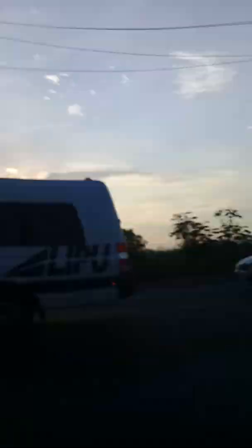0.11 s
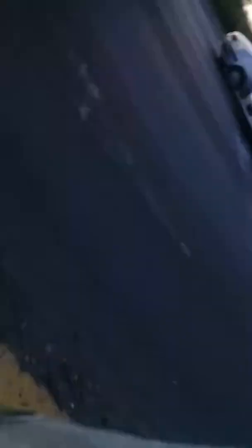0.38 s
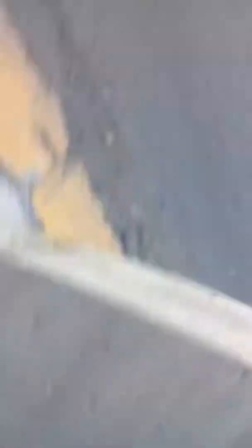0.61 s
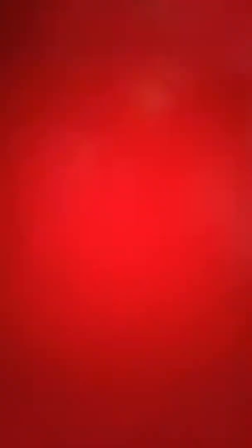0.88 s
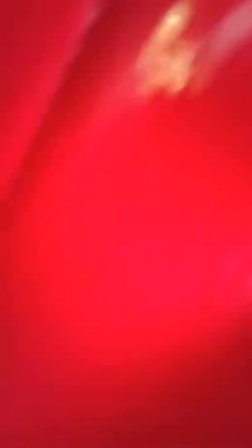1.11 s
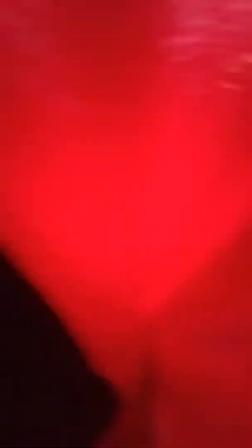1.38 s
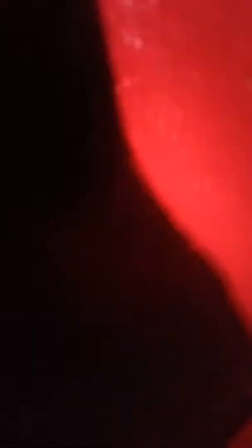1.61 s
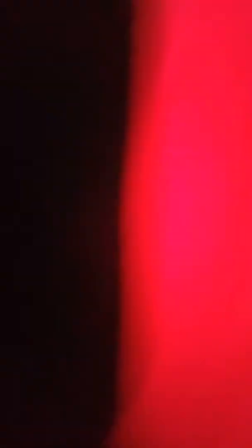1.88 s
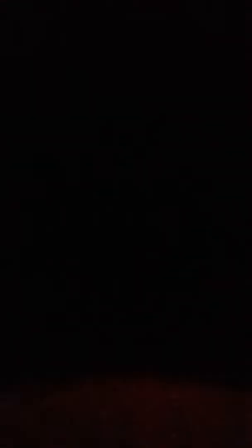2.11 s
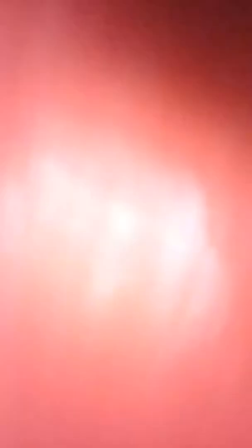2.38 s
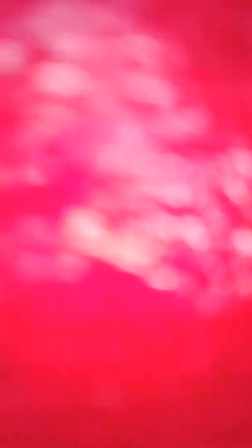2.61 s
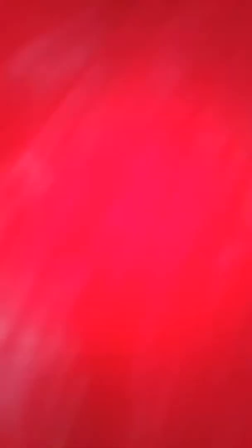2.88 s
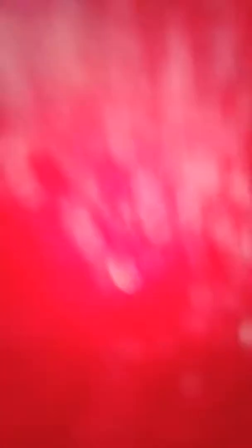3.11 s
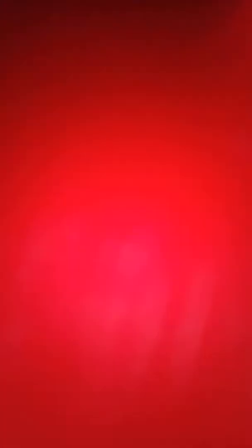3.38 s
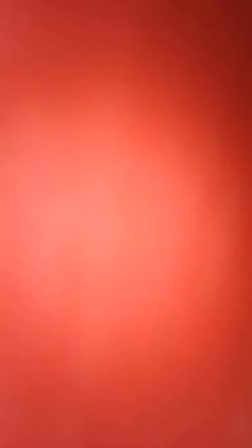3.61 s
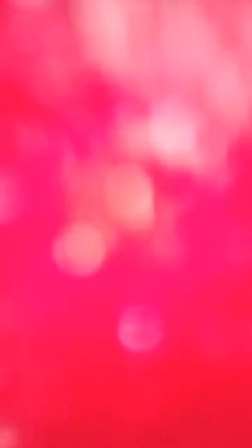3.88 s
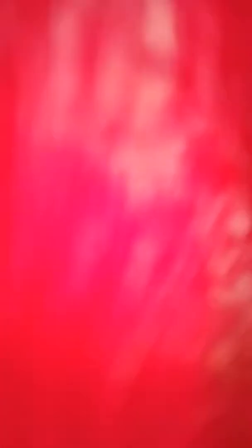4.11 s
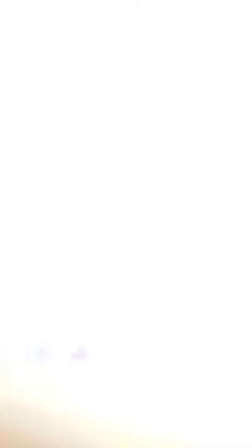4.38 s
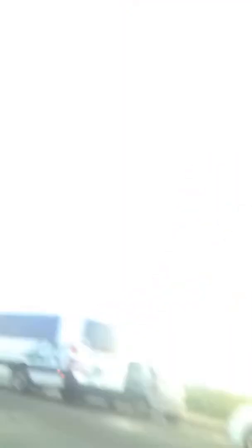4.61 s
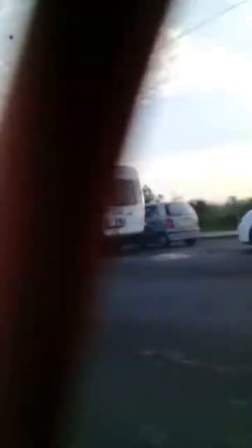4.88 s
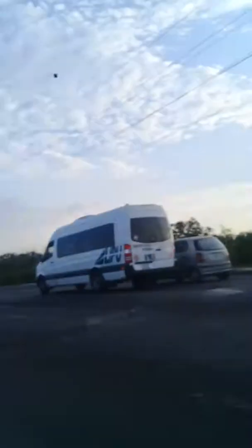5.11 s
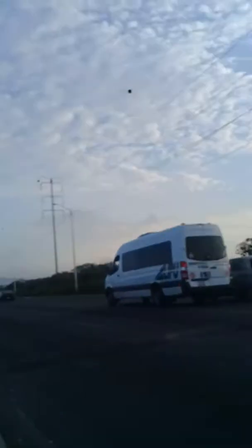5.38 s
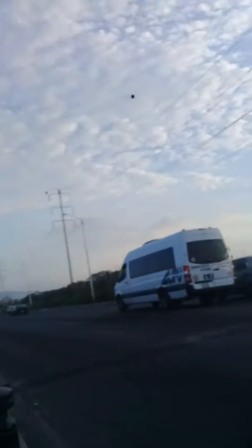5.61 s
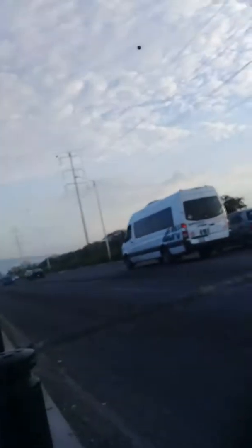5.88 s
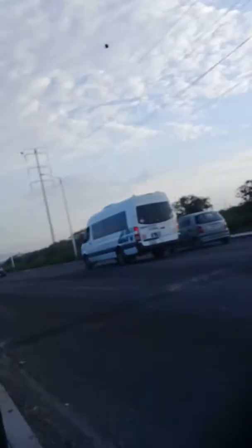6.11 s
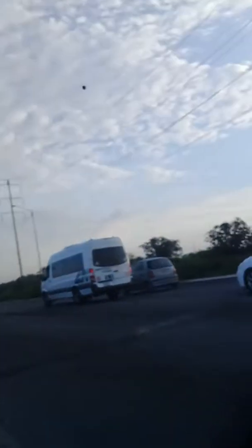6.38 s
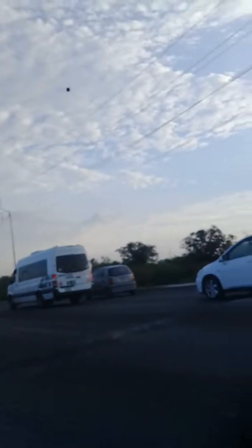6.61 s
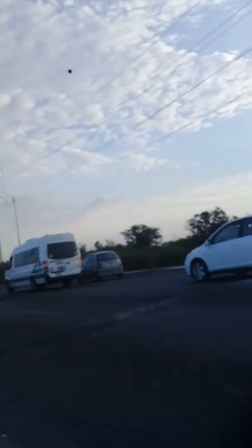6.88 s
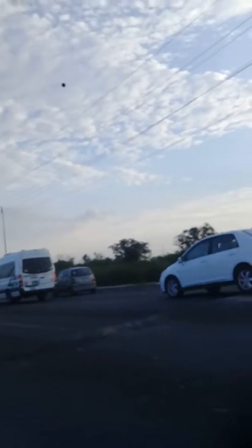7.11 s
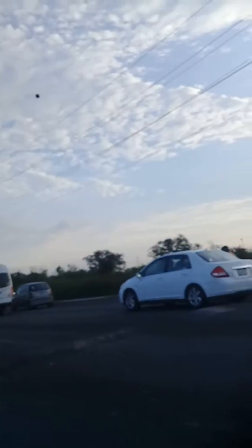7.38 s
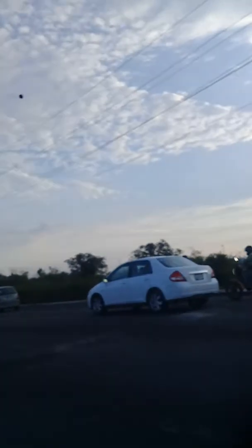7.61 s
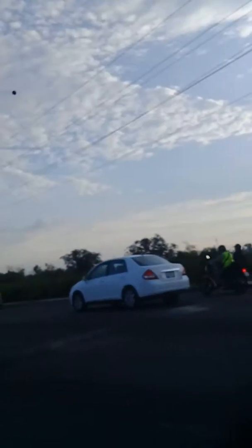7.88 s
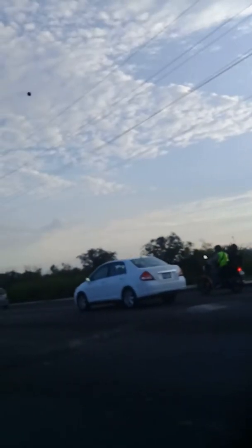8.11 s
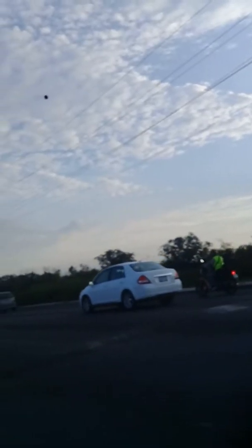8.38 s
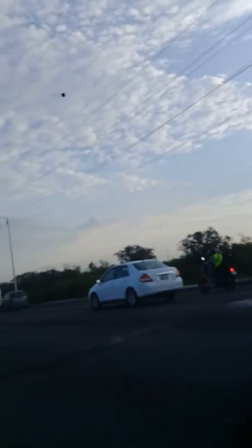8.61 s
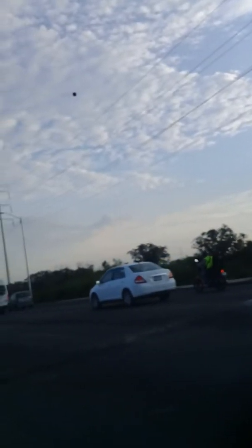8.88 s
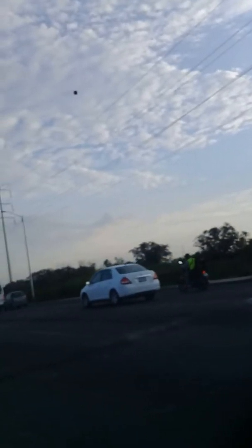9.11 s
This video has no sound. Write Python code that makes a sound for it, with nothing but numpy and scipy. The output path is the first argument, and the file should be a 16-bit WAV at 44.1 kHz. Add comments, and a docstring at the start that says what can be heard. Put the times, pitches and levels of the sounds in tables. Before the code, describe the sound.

Beside a suburban road, a heavy diesel idles low, then accelerates with rising pitch and a rough bark, loudest around three seconds, before easing off and fading. Tyre roar swells with it. Lighter engines then drone past, with soft whooshes, scattered dry ticks, tiny squeaks and two faint air puffs. Outdoor hand-held phone, close handling sounds, slight hiss, single channel.

```python
"""A heavy diesel idles along, pulls away hard and lifts off on a suburban road, heard through a hand-held
phone. Its engine is a sum of orders of the firing rate, coloured by silencer and exhaust pipe. Smaller engines,
and the heavy engine's fading fourth order, drone as gliding tones; tyres roar, hiss and whoosh past as coloured
noise. Brakes squeak as short trembling tones, short bursts of bright noise hiss twice, small metal parts tick
as dying noise bursts."""
import sys
import numpy as np
from scipy import signal
from scipy.fft import rfft, irfft, next_fast_len
from scipy.io import wavfile
from scipy.ndimage import uniform_filter1d, map_coordinates

SR = 44100
rng = np.random.default_rng(int(sys.argv[2]) if len(sys.argv) > 2 else 0)


def to_wav(s):
    """Save 16-bit WAV."""
    ch = np.atleast_2d(s).T  # columns
    pcm = np.round(np.clip(ch, -1, 1) * 32767)  # PCM
    wavfile.write(sys.argv[1], SR, pcm.astype(np.int16))


def boost_factor(decibels):
    """Convert a level in decibels to a linear amplitude factor."""
    exponent = np.asarray(decibels, float) / 20
    return 10 ** exponent


N = 407925


def unit(x):
    """Scale to rms 1."""
    return x / np.sqrt(np.mean(x ** 2) + 1e-20)


def along(points, hz):
    """Read a curve of (hz, value) points on a log frequency axis."""
    point_hz, value = np.transpose(points)
    return np.interp(np.log(hz + 1), np.log(point_hz + 1), value)


def curves(rows):
    """A gate that is open while the rows last, then one value per sample for each column after the time."""
    time_s, *columns = np.transpose(rows)
    t = np.arange(N) / SR
    fade_s = 0.03
    nearest_end = np.minimum(t - time_s[0] + fade_s, time_s[-1] + fade_s - t)
    gate = np.clip(nearest_end / fade_s, 0, 1)
    return gate, *[np.interp(t, time_s, column) for column in columns]


def wobble(rate):
    """A smooth random curve with rate knots a second."""
    knots = rng.standard_normal(int(N * rate / SR) + 4)
    return map_coordinates(knots, [np.arange(N) * rate / SR])


def rush(spectrum, patchy_db):
    """Coloured noise of rms 1 whose gain varies in random patches of time and frequency."""
    z = signal.stft(rng.standard_normal(N + 512), nperseg=512)[2]
    patches = uniform_filter1d(rng.standard_normal(z.shape), 5, 0)
    patches = uniform_filter1d(patches, 10, 1)
    patchy = signal.istft(z * boost_factor(patchy_db * unit(patches)), nperseg=512)[1][:N]
    size = next_fast_len(N + 8192)
    colour = boost_factor(along(spectrum, np.fft.rfftfreq(size, 1 / SR)))
    return unit(irfft(rfft(patchy, size) * colour, size)[:N])


def heavy_engine():
    """Exhaust orders, multiples of the firing rate; returns them with their gate and the firing phase."""
    # the drive: time_s, firing_rate_hz, effort_db (low orders), bark_db (higher orders)
    drive = [(0.0, 31.35, -34.5, -47), (0.3, 30.99, -36, -49), (1.15, 29.59, -36, -48.0),
             (1.4, 28.6, -36, -49.2), (1.68, 25.75, -32.5, -50.5), (1.8, 27.64, -35, -52),
             (2.2, 31.73, -31.5, -42.5), (2.55, 36.12, -30, -32), (2.85, 39.64, -24.5, -27),
             (3.12, 42.54, -22.5, -27.8), (3.24, 44.42, -25.4, -28), (3.36, 45.38, -26, -33),
             (3.5, 46.68, -27, -29.5), (3.65, 48.1, -26.5, -39), (3.8, 49.58, -23.3, -41.5),
             (3.93, 49.8, -23.5, -44), (4.02, 48.87, -29.5, -38), (4.12, 48.5, -34.8, -43.5),
             (4.25, 47.12, -35.5, -44.2), (4.4, 45.08, -33, -55), (4.68, 39.5, -39, -58)]
    # low orders at the source: order, idling_db, pulling_db, coasting_db
    low_orders = [(2.0, -4.5, 9, -1.0), (3.0, 9.5, 9.5, 8.5), (4.0, 11.5, 5, -0.8), (5.0, 4.5, -5.4, -1),
                  (6.0, -2, -0.0, 1), (7.0, -5, -5, -9.5), (8.0, -10.0, -3.5, -11)]
    # silencer and ground, resonances near 65, 143, 165, 240, 325 and 370 Hz with dips between: freq_hz, gain_db
    silencer = [(50.0, 3.5), (62.0, 9), (72.0, 4.5), (85.0, -8), (100.0, -2), (128.0, -0.2), (136.0, -0.9),
                (143.0, 8.5), (152.0, 3.5), (165.0, 6), (178.0, 3.5), (190.0, -4), (205.0, -8),
                (225.0, 1.5), (245.0, 3), (265.0, -11), (285.0, -8.5), (305.0, -1.3), (325.0, 4),
                (345.0, -4), (370.0, 7), (400.0, -6)]
    # exhaust pipe under load: freq_hz, gain_db
    pipe = [(330, -5), (400, -15), (460, 2), (550, -11), (630, -6), (720, -6), (790, -18), (860, -19.5),
            (1200, -28.5)]
    pull_s, lift_s = (1.82, 2.53), (3.6, 4.08)  # the driver opens the throttle, then lifts off: from, to

    t = np.arange(N) / SR
    gate, hz, effort_db, bark_db = curves(drive)
    phase = 2 * np.pi * np.cumsum(hz) / SR + 0.027 * wobble(24.82)

    def order(k, drift):
        """One order; echoes off road and walls shift its phase slowly as the vehicle moves."""
        return np.sin(k * phase + drift * wobble(1.466))

    # the low orders swell one by one as they cross the silencer's resonances
    boom = np.zeros(N)
    for k, idle_db, pull_db, coast_db in low_orders:
        source_db = np.interp(t, [*pull_s, *lift_s], [idle_db, pull_db, pull_db, coast_db])
        level_db = effort_db + source_db + along(silencer, k * hz) + 0.63 * wobble(12)
        boom += np.sqrt(2) * boost_factor(level_db) * order(k, drift=1.0)

    # strong pressure waves steepen: crests and troughs travel at different speeds, so each fall sharpens
    arrival = np.maximum.accumulate(t + 0.00048 * boom)
    boom = np.interp(t, arrival, boom)

    # the higher orders come forward with load and stay nearly in step: one sharp edge per firing
    bark = np.zeros(N)
    for k in range(9, 24):
        bark += boost_factor(along(pipe, k * hz) + 2.5 * wobble(6.044)) * order(k, drift=0.85)
    return gate * (boom + boost_factor(bark_db) * bark), gate, phase


def traffic_db(centre_hz, far_db, pass_db, loss_db):
    """Level of one noise: far traffic plus every pass, fading with distance and tilted by its brightness."""
    # passing vehicles: closest_s, approach_s, retreat_s, level_db, brightness in dB per octave above 500 Hz
    passes = [(.5, 1, 1, -11.5, 2.5), (2.25, 0.32, .6, -4, 1.1), (3, 0.35, 0.52, 0, 0.5),
              (3.7, 0.54, 0.24, -4.5, -.5), (4.55, 0.31, 0.54, -15.5, 4), (5.25, .3, .3, -12.5, 4.5),
              (5.8, 0.38, 0.43, -7.5, 4), (6.6, 0.26, 0.38, -7, -1), (8.5, .1, .5, -10.5, 2.8),
              (9.3, 0.34, .5, -4, 1.5)]
    t = np.arange(N) / SR
    power = boost_factor(2 * far_db)  # doubled dB turn amplitude into power
    for closest_s, approach_s, retreat_s, level_db, bright_db in passes:
        # distance is 1 at the closest point
        distance = np.hypot(1, (t - closest_s) / np.where(t < closest_s, approach_s, retreat_s))
        tilt_db = bright_db * np.log2(centre_hz / 500)
        power = power + boost_factor(2 * (pass_db + level_db + tilt_db - loss_db * np.log10(distance)))
    return 10 * np.log10(power)


def road(gate, phase):
    """Four coloured noises of traffic; the heavy engine's firings pulse the roar and clatter while it sounds."""
    # rumble, roar, clatter, hiss: centre_hz, far_traffic_db, plain_pass_db, distance loss in dB per decade
    noises = [(100, -30.5, -24, 15.5), (500, -32.5, -30, 20.5), (2100, -52, -44.5, 22.5),
              (8000, -71, -59.5, 37.5)]
    # colours of the four noises: freq_hz, relative_db
    rumble_colour = [(15, -57), (25, -34.5), (42, -9), (92, -3), (140, -3), (204, -7.5), (300, -15),
                     (390, -41.5), (660, -120)]
    roar_colour = [(150, -26.5), (250, -2.5), (367, -1.5), (431, -2.5), (599, -7.5), (768, -9.5),
                   (1110, -14), (1560, -24), (1700, -26.5), (2210, -38.5), (3740, -120)]
    clatter_colour = [(880, -29), (1500, -1.5), (2190, 0), (2760, -4.5), (3080, -5), (3970, -7),
                      (6000, -16.5), (7800, -37), (13200, -120)]
    hiss_colour = [(3240, -35), (5500, -1.5), (6520, -4.5), (7170, -3.5), (9000, -8.5), (9730, -7.5),
                   (12600, -13.5), (15600, -22)]

    rumble_db, roar_db, clatter_db, hiss_db = [traffic_db(*row) for row in noises]
    t = np.arange(N) / SR
    # a hand over the phone dulls the hiss by 3 dB
    hand_from_s, hand_to_s, hand_fade_s = 2.45, 3.6, 0.25
    hand = np.clip(np.minimum(t - hand_from_s, hand_to_s - t) / hand_fade_s, 0, 1)
    hiss_db = hiss_db - 3 * hand

    shared = wobble(7)  # clatter and hiss waver together
    firing = gate * np.cos(phase - 0.3)
    grit = 0.91 * wobble(90)  # stones and tread make the hiss grainy
    rumble = boost_factor(rumble_db) * rush(rumble_colour, patchy_db=0.5)
    roar = boost_factor(roar_db + 0.34 * firing) * rush(roar_colour, patchy_db=0.5)
    clatter = boost_factor(clatter_db + 0.53 * shared + 1.1 * firing) * rush(clatter_colour, patchy_db=1.5)
    hiss = boost_factor(hiss_db + 0.3 * shared + grit) * rush(hiss_colour, patchy_db=1.0)
    return rumble + roar + clatter + hiss


def squeaks():
    """Rubbing metal sings briefly: a gliding, trembling tone, with a weak octave on the lower squeaks."""
    # start_s, length_s, start_hz, end_hz, level_db
    squeak_rows = [(.67, 0.15, 12100, 12550, -73), (.81, 0.14, 12600, 12600, -74),
                   (.92, .08, 12450, 12350, -69), (1.88, 0.036, 12300, 12600, -74),
                   (3.18, .05, 12400, 12400, -77), (4.029, .05, 12350, 12600, -61),
                   (4.94, .06, 12350, 12500, -63), (5.666, .024, 2104, 2340, -35),
                   (5.85, 0.027, 7300, 7200, -50), (5.923, .08, 7300, 7300, -57),
                   (6.295, 0.06, 7350, 7300, -58), (7.3, .06, 9950, 9950, -67),
                   (7.417, .03, 7700, 7700, -73), (8.175, 0.075, 6150, 6000, -55),
                   (8.355, 0.033, 1950, 1950, -39), (9.14, 0.035, 3250, 3380, -47),
                   (8.6, 0.6, 9350, 9250, -74)]
    out = np.zeros(N + SR)
    for start_s, length_s, start_hz, end_hz, level_db in squeak_rows:
        n = int(length_s * SR)
        glide_hz = np.linspace(start_hz, end_hz, n)
        phase = 2 * np.pi * np.cumsum(glide_hz) / SR + 1.1 * wobble(320)[:n]
        octave = 0.16 * np.sin(2 * phase) * (end_hz < SR / 8)
        swell = np.sqrt(np.hanning(n))
        out[round(start_s * SR):][:n] += np.sqrt(2) * boost_factor(level_db) * swell * (np.sin(phase) + octave)
    return out[:N]


def ticks():
    """Small hard contacts: dying noise in a band; a narrow band rings like metal."""
    # start_s, centre_hz, width_hz, level_db, t60_s (time to fall by 60 dB)
    tick_rows = [(1.54, 8500, 3000, -55, 0.022), (5.25, 12000, 5000, -56, 0.025),
                 (5.381, 14500, 2500, -44, 0.029), (5.632, 1700, 1480, -30.5, 0.09),
                 (5.835, 3300, 1514, -40.5, .02), (6.214, 8000, 9000, -40, .025),
                 (6.558, 4500, 2996, -40, 0.019), (7.177, 4500, 7000, -36.5, 0.027),
                 (7.176, 9970, 500, -40, 0.025), (7.28, 8000, 6000, -54, 0.048),
                 (7.298, 7000, 8000, -48, 0.027), (7.532, 4940, 14000, -40, .06),
                 (7.544, 6450, 300, -48, .06), (7.668, 5380, 60, -46.5, 0.11),
                 (7.668, 6500, 1200, -46, .04), (7.668, 10500, 2500, -54, .04),
                 (7.852, 1500, 1000, -29, 0.022), (8.253, 4000, 1400, -38.5, 0.015),
                 (9.125, 1800, 1500, -39, .025), (9.003, 4100, 600, -34, 0.024),
                 (9.004, 2490, 1500, -33, 0.034)]
    n = SR // 8
    out = np.zeros(N + SR)
    t, hz = np.arange(n) / SR, np.fft.rfftfreq(n, 1 / SR)
    onset = 1 - np.exp(-t / 0.0006)
    for start_s, centre_hz, width_hz, level_db, t60_s in tick_rows:
        band = np.exp(-2 * ((hz - centre_hz) / width_hz) ** 2)
        burst = unit(irfft(rfft(rng.standard_normal(n)) * band, n))
        out[round(start_s * SR):][:n] += boost_factor(level_db - 60 * t / t60_s) * burst * onset
    return out[:N]


def whooshes():
    """Passing bodies and tyres each bring a band of noise that swells and fades."""
    # start_s, length_s (2 s at most is used), centre_hz, width_hz, level_db
    whoosh_rows = [(2.71, .9, 3300, 460, -50.5), (1.7, 1.9, 476, 85, -34.5), (2.1, 0.65, 1060, 150, -40),
                   (2.5, 1.2, 7400, 900, -64.5), (8.3, 0.97, 3200, 1500, -52),
                   (4.13, 0.82, 3770, 1201, -50.5), (4.394, 1.56, 13000, 5000, -67.5),
                   (4.895, 3.6, 1100, 250, -43.5), (6.396, 1.5, 2040, 300, -53),
                   (8.603, 1.5, 700, 250, -38.5)]
    out = np.zeros(N + SR)
    hz = np.fft.rfftfreq(2 * SR, 1 / SR)
    for start_s, length_s, centre_hz, width_hz, level_db in whoosh_rows:
        n = int(min(length_s, 2) * SR)
        band = np.exp(-2 * ((hz - centre_hz) / width_hz) ** 2)
        noise = unit(irfft(rfft(rng.standard_normal(2 * SR)) * band))[:n]
        out[round(start_s * SR):][:n] += boost_factor(level_db) * np.sqrt(np.hanning(n)) * noise
    return out[:N]


def drones():
    """Each drone is one slightly unsteady tone that swells, glides and fades: lighter engines, a gear whine,
    and from 4.55 s the heavy engine's fourth order dying away."""
    # start_s, length_s, start_hz, end_hz, level_db
    drone_rows = [(4.75, 0.83, 45, 62, -36), (5.8, 0.42, 59.5, 65, -28.5), (6.2, 0.55, 61, 65.5, -30),
                  (4.55, .65, 166, 138, -26.5), (5.2, .55, 120, 160, -29), (5.5, 0.99, 138, 146, -33),
                  (6.1, 0.42, 427, 438, -37), (6.4, .95, 434, 419, -39), (8.85, 0.53, 740, 742, -44),
                  (9.8, .32, 90, 97, -33)]
    out = np.zeros(N + SR)
    for start_s, length_s, start_hz, end_hz, level_db in drone_rows:
        n = int(length_s * SR)
        glide_hz = np.linspace(start_hz, end_hz, n)
        phase = 2 * np.pi * np.cumsum(glide_hz) / SR + 0.21 * wobble(12.7)[:n]
        level = boost_factor(level_db + 0.65 * wobble(8.9)[:n])
        swell = np.hanning(n) ** 0.28
        out[round(start_s * SR):][:n] += np.sqrt(2) * level * swell * np.sin(phase)
    return out[:N]


def hiss_bursts():
    """Short bursts of bright, slightly sputtering noise that rise, hold and die."""
    # start_s, length_s (until the fall begins), level_db
    burst_rows = [(7.35, .22, -57), (8.15, 0.13, -56)]
    # colour of the bursts: freq_hz, relative_db
    burst_colour = [(2650, -40), (4500, -25), (4860, -17), (5260, -2), (6080, 2.5), (7000, -6.5),
                    (11300, -4.5), (14000, -14), (15600, -25)]
    rise_s, fall_db_per_s = 0.04, 130
    t = np.arange(N) / SR
    level = np.zeros(N)
    for start_s, length_s, level_db in burst_rows:
        rise = np.clip((t - start_s) / rise_s, 0, 1)
        fall_db = fall_db_per_s * np.maximum(t - start_s - length_s, 0)
        level += rise * boost_factor(level_db - fall_db)
    sputter = boost_factor(0.6 * wobble(70))
    return level * sputter * rush(burst_colour, patchy_db=3.0)


def scene():
    """All sources at one microphone."""
    engine, gate, phase = heavy_engine()
    mix = engine + road(gate, phase) + squeaks() + ticks() + whooshes() + drones() + hiss_bursts()
    return mix[None]


def low_pass(x):
    """Removes everything above the highest recorded frequency."""
    return signal.sosfilt(signal.butter(12, 15720, fs=SR, output="sos"), x)


def record(dry):
    """The microphone adds its own faint hiss and the input stage rounds the loudest peaks."""
    hissy = dry + boost_factor(-80.5) * rng.standard_normal(N)
    ceiling = 0.88
    rounded = hissy / (1 + np.abs(hissy / ceiling) ** 4) ** (1 / 4)
    return low_pass(rounded)


dry = scene()
out = record(dry)
to_wav(out)
```